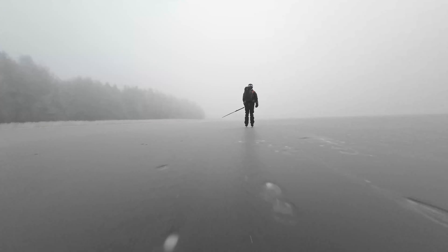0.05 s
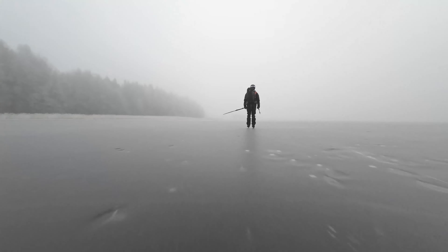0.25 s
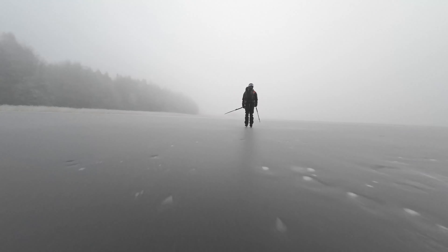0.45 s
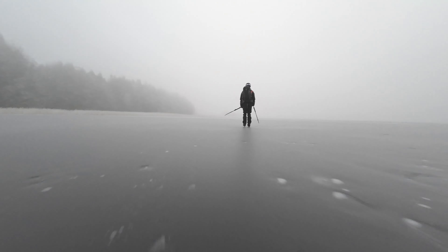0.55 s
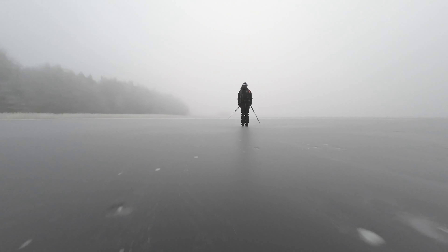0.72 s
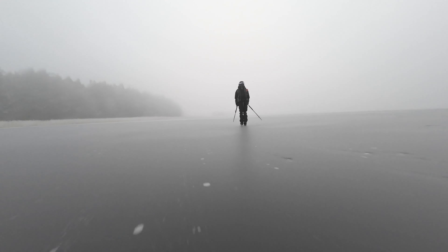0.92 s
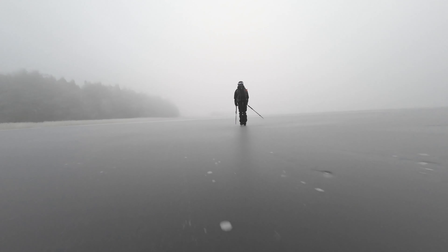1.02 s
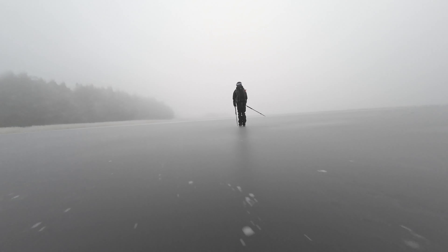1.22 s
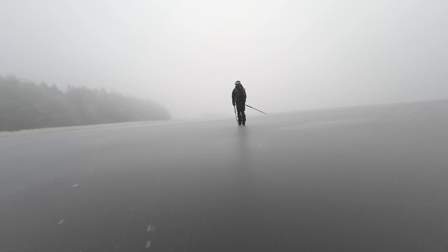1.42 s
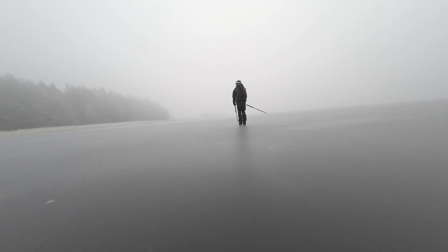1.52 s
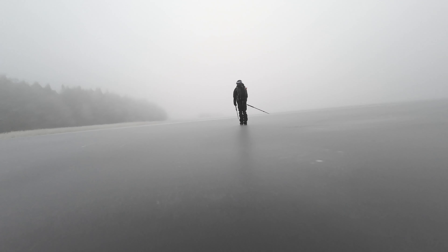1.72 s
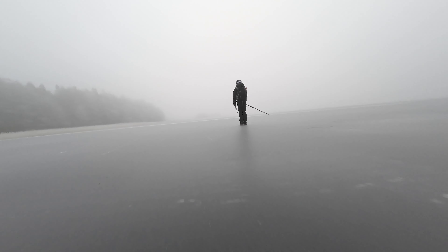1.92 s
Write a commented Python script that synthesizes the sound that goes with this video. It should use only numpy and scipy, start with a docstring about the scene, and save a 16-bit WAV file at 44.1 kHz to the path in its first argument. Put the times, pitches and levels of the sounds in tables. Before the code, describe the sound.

Skate blades hiss on outdoor ice, heard from the skater's position with light wind on the microphone. A pole bites with one loud crack and a short scrape, followed by irregular clacks and dull thumps over bumps.

```python
"""Out on lake ice, close up: touring skates heard from the microphone of the skater's own camera.
The blades rasp and hiss on the grain of the ice and knock over its ridges and bumps.
A steel pole tip clicks and rings; the loaded pole bites with a loud crack and scrapes along behind.
Pole and skates sit in the centre, the hiss lies wide, and light wind rumbles on the microphone."""
import sys
import numpy as np
from scipy import signal
from scipy.fft import rfft, irfft
from scipy.io import wavfile

SR = 44100
rng = np.random.default_rng(int(sys.argv[2]) if len(sys.argv) > 2 else 0)


def wav_record(signal):
    """Record a signal, one row per channel, as 16-bit PCM in the file named by sys.argv[1]."""
    frames = np.transpose(np.atleast_2d(signal))
    bounded = np.clip(frames, -1, 1)
    # unit amplitude maps onto the largest positive 16-bit level
    quanta = np.round(bounded * 32767).astype(np.int16)
    wavfile.write(sys.argv[1], SR, quanta)


N = 85995

# rasp of the blades underfoot (t/s, level/dB) and its spectrum (f/Hz, level/dB)
RASP_FADER = [(0, -60.5), (0.21, -59.5), (0.32, -52), (0.5, -50.5), (0.62, -51.5), (0.69, -52.5),
              (0.8, -50), (0.92, -49.5), (1.045, -50.5), (1.09, -44.5), (1.16, -50.5), (1.22, -49.5),
              (1.27, -53), (1.42, -51.5), (1.55, -48.5), (1.67, -50), (1.83, -49), (1.95, -50.5)]
RASP_SPECTRUM = [(60, 4), (150, 4.5), (300, 1.5), (500, -8), (800, -4.5), (1400, 0.5), (2000, 0),
                 (2800, -3), (3600, -6.5), (4500, -8.5), (5800, -5.5), (7500, -15.5), (11000, -17.5),
                 (16000, -46)]
# ring of the gliding skate (f/Hz, level/dB, t60/s)
SKATE_RING = [(466, 8.5, 0.031), (886, -4.5, 0.023), (1197, -0.5, 0.02), (1594, 0.5, 0.013),
              (1972, 0, 0.048), (2604, 0, 0.066), (2774, -1.5, 0.047), (6030, -2.5, 0.0048),
              (10800, -6, 0.006)]
# spectrum of the flutter in the glide's level (f/Hz, level/dB)
FLUTTER_SPECTRUM = [(4, -30), (14, 0), (40, -1), (120, -30), (500, -80)]
# the loaded edge sings faintly during the stroke (t/s, level/dB)
SING_FADER = [(0.6, -79), (0.9, -64.5), (0.98, -55), (1.05, -58), (1.1, -54), (1.19, -56.5), (1.26, -72)]
# fine hiss of the edges (t/s, level/dB) and its spectrum on each side (f/Hz, level/dB)
HISS_FADER = [(0, -67.5), (0.21, -68), (0.34, -49.5), (0.46, -53), (0.52, -58), (0.7, -61), (0.95, -56.5),
              (1.09, -56), (1.3, -58.5), (1.6, -55), (1.95, -58)]
HISS_LEFT_SPECTRUM = [(1000, -76), (3000, -60), (4300, 11), (5800, 22.5), (7500, 25), (11400, 5),
                      (12200, -15), (16000, -13)]
HISS_RIGHT_SPECTRUM = [(1000, -37), (3000, -67), (4500, -2.5), (6000, 9), (8000, 4.5), (11200, 8.5),
                       (12500, -3.5), (16000, -9.5)]
# wind on the microphone (t/s, level/dB) and its spectrum (f/Hz, level/dB)
WIND_FADER = [(0, -50), (0.5, -48.5), (0.59, -47), (0.66, -50.5), (1.1, -55), (1.35, -43), (1.6, -47),
              (1.82, -43.5), (1.95, -47)]
WIND_SPECTRUM = [(8, -10.5), (25, 4), (45, -10), (80, -13.5), (140, -19), (300, -38), (1000, -44)]
# the steel tip touches the ice (t/s, level/dB)
TIP_TOUCHES = [(0.0211, -41), (0.234, -22), (1.459, -36)]
# ring of the tip (f/Hz, level/dB, t60/s) and spectrum of its click (f/Hz, level/dB)
TIP_RING = [(730, -17, .018), (1300, -7, .02), (2240, -7, 0.041), (2660, -6, 0.063), (2640, -24, 0.099),
            (3370, -13.5, 0.069), (4530, -11, 0.026), (5060, -12.5, 0.067), (5510, -8, 0.033),
            (7540, -31, .07), (7900, -41, 0.07), (9200, -27, 0.051), (10270, -20, 0.04),
            (11000, -25.5, 0.063), (13710, -24, .025)]
CLICK_SPECTRUM = [(200, -14), (700, -1.5), (2500, 4), (5500, 3), (7500, -10.5), (11000, -21), (16000, -19)]
# bumps thump through skate and ice (t/s, level/dB, f/Hz, t60/s)
BUMPS = [(0.021, -36.5, 114, 0.022), (0.3279, -22, 163, 0.025), (0.3646, -19.5, 127, 0.023),
         (0.3945, -27.5, 230, 0.021), (0.3972, -28, 712, 0.03), (0.437, -29.5, 302, 0.054),
         (0.4893, -30, 190, 0.024), (0.5398, -30, 277, 0.013), (0.5861, -29, 178, 0.022),
         (0.6488, -21, 306, 0.014), (0.869, -34, 280, 0.022), (0.9950, -28.5, 358, 0.01),
         (1.0625, -30.5, 370, .014), (1.1960, -34, 300, 0.013), (1.4555, -18, 433, 0.012),
         (1.481, -34, 86, 0.098), (1.481, -20.5, 290, 0.014), (1.5097, -24, 294, 0.0098),
         (1.5435, -25.5, 305.6, 0.0095), (1.57, -33.5, 310, 0.017), (1.5772, -28, 297, 0.012),
         (1.6913, -20.5, 323, 0.017), (1.756, -19.5, 357, 0.012), (1.7868, -35, 412, 0.021),
         (1.801, -34.5, 76.3, 0.12), (1.839, -32, 240, 0.016), (1.930, -33.5, 300, 0.014)]
# the pole catches, takes the skater's weight and settles (t/s, level/dB)
POLE_LOADS = [(0.2548, -19), (0.2561, -8), (0.2790, -39)]
# ring of the loaded pole (f/Hz, level/dB, t60/s)
POLE_RING = [(193, -9, .012), (380, -4, .012), (500, -2.5, 0.013), (802, -15, 0.027), (1168, -4.5, 0.029),
             (1558, -3, 0.02), (2118, 0, 0.02), (2307, -1, 0.02), (2674, -5, 0.04), (2860, -17.5, 0.053),
             (3150, -11.5, 0.024), (3570, -13.5, 0.019), (3950, -18.5, 0.015), (4600, -17.5, 0.015),
             (6400, -22, .012), (10200, -40, .012)]
# ice crunching under steel, and the chips it sheds (f/Hz, level/dB)
CRUNCH_SPECTRUM = [(100, -12), (300, -4), (550, -2), (950, -3), (1500, -2.5), (2300, -2.5), (3000, -19),
                   (4500, -32.5), (8000, -31), (16000, -48)]
CHIP_SPECTRUM = [(1000, -22), (3300, 10), (5700, -0.5), (7500, -8), (11000, -9), (16000, -33)]
# scrape of the planted tip (t/s, level/dB) and its spectrum (f/Hz, level/dB)
SCRAPE_FADER = [(0.305, -68.5), (0.335, -41), (0.358, -39), (0.38, -41), (0.415, -40), (0.44, -40),
                (0.458, -43), (0.48, -49), (0.56, -52), (0.66, -58.5)]
SCRAPE_SPECTRUM = [(80, 3.5), (400, -2), (750, -6.5), (1300, 1), (1900, -0.5), (2700, -7), (4200, -14.5),
                   (5600, -16.5), (7500, -45), (11300, -33), (16000, -22)]
# steel resonances that the scrape keeps ringing (f/Hz, level/dB, t60/s)
SCRAPE_RING = [(750, 5.5, 0.013), (1336, 1, 0.028), (2660, -3.5, 0.15), (3410, 0, 0.035),
               (4910, -1.5, 0.023), (5730, -1, .024), (8400, -35, 0.019), (9000, -48, 0.025),
               (10800, -28, 0.03), (11400, -4.5, 0.029), (13300, -19, .012)]
# a blade hits a ridge (t/s, level/dB, grinding time/s, ring f/Hz, relative ring/dB, relative chips/dB)
RIDGES = [(0.327, -38.5, 0.0041, 2290, -24, -8), (0.3954, -30, 0.0012, 1270, 9.5, -6.5),
          (0.6478, -36.5, 0.0024, 1620, 3, -29), (0.683, -53, .001, 2780, -6, -0.5),
          (0.867, -50, 0.0069, 1400, -10, -27), (0.9947, -38.5, 0.00087, 1130, 10.5, -17),
          (1.0270, -47, 0.0033, 2760, 7, -14), (1.062, -32.5, 0.00071, 1440, 8, -14),
          (1.1959, -33, 0.0029, 1220, 6, -16), (1.2006, -35.5, 0.0015, 1930, 7, -15),
          (1.4540, -35.5, .002, 1520, -20, -24), (1.4562, -25, 0.0014, 1647, 12, -15.5),
          (1.4778, -36, 0.0055, 1920, 7, -17), (1.5090, -38, 0.0012, 1730, -8, -25),
          (1.6910, -31, 0.0022, 1360, -2, -24), (1.6941, -32.5, 0.0015, 2400, -18, -15.5),
          (1.729, -50, 0.0023, 2210, 15, -3), (1.7860, -42.5, 0.0012, 1690, 10, -12),
          (1.8010, -50, 0.0013, 2240, 12, -21)]
# share of the sound scattered differently to each side (f/Hz, level/dB)
SCATTER_SPECTRUM = [(100, -29), (700, -27.5), (1300, -58), (2400, -23), (4400, -8), (8000, -3), (15000, 3)]


def undb(db):
    """Decibels to gain."""
    return 10 ** (np.asarray(db) / 20)


def unit(x):
    """Scale to rms 1."""
    return x / np.sqrt(np.mean(x ** 2))


def since(start):
    """Seconds since a moment, zero before it."""
    return np.maximum(np.arange(N) / SR - start, 0)


def fader(points):
    """Gain that follows (t/s, level/dB) points."""
    return undb(np.interp(np.arange(N) / SR, *np.array(points).T))


def equalise(x, spectrum):
    """Filter along (f/Hz, level/dB) points."""
    hz, db = np.array(spectrum).T
    f = np.maximum(np.fft.rfftfreq(N, 1 / SR), 1)
    return irfft(rfft(x) * undb(np.interp(np.log(f), np.log(hz), db)), N)


def noise(spectrum):
    """Coloured noise at rms 1."""
    return unit(equalise(rng.standard_normal(N), spectrum))


def grains(per_s, spread_db):
    """Tiny fractures of the ice: random clicks, a few much larger than the rest."""
    size = undb(spread_db * np.minimum(rng.exponential(size=N), 6))
    return unit((rng.random(N) < per_s / SR) * size * rng.choice([-1, 1], N))


def burst(start, fall_s, hold_s=0):
    """Envelope with a sudden attack, a hold and an exponential fall."""
    t = since(start)
    return np.minimum(t / 0.00036, 1) * np.exp(-np.maximum(t - hold_s, 0) / fall_s)


def ring(start, modes, rise_s):
    """Damped modes (f/Hz, level/dB, t60/s) of alternating sign, set going by a push over rise_s."""
    t = since(start)
    waves = np.zeros(N)
    for k, (hz, db, t60) in enumerate(modes):
        decay = np.exp(-np.log(1000) * t / t60)
        waves -= (-1) ** k * undb(db) * np.sin(2 * np.pi * hz * t) * decay
    return waves * (1 - np.exp(-t / rise_s))


def resonate(x, modes):
    """Modes kept ringing by a steady signal, at rms 1."""
    return unit(signal.fftconvolve(x, ring(0, modes, rise_s=1 / SR))[:N])


def glide():
    """Underfoot the blades rasp unevenly on the ice, ring and sing; their hiss differs left and right."""
    flutter = undb(1.38 * noise(FLUTTER_SPECTRUM))
    grit = grains(per_s=9000, spread_db=1.9)
    rasp = unit(equalise(grit, RASP_SPECTRUM)) + undb(-10.5) * resonate(grit, SKATE_RING)
    sing = fader(SING_FADER) * resonate(rng.standard_normal(N), [(2756, 0, 0.015)])
    hiss = np.array([undb(-9.5) * noise(HISS_LEFT_SPECTRUM), undb(-0.5) * noise(HISS_RIGHT_SPECTRUM)])
    centre = flutter * (fader(RASP_FADER) * rasp + sing)
    return centre + np.sqrt(flutter) * fader(HISS_FADER) * hiss


def wind():
    """Low buffeting right on the microphone, unrelated on the two sides and stronger on the left."""
    return fader(WIND_FADER) * np.array([noise(WIND_SPECTRUM), undb(-3) * noise(WIND_SPECTRUM)])


def tip_taps():
    """A pole's length away, the steel tip clicks and rings each time it touches the ice."""
    out = np.zeros(N)
    for start, db in TIP_TOUCHES:
        click = undb(-4.5) * noise(CLICK_SPECTRUM) * burst(start, fall_s=0.0044)
        out += undb(db) * (ring(start, TIP_RING, rise_s=0.00038) + click)
    return out


def bump_thumps():
    """Each bump sends a dull thump through skate and ice: a low mode and one overtone."""
    out = np.zeros(N)
    for start, db, hz, t60 in BUMPS:
        overtone = (hz * 1.673, db - 8.5, 0.014)
        out += ring(start, [(hz, db, t60), overtone], rise_s=0.00097)
    return out


def pole_bite():
    """Close and loud, the loaded pole rings and cracks into the ice, which shudders and sheds chips."""
    out = np.zeros(N)
    push_s = 0.0022
    for start, db in POLE_LOADS:
        crack = undb(-23) * burst(start, fall_s=0.0018, hold_s=push_s)
        shudder = undb(-21) * burst(start, fall_s=0.018)
        chips = undb(-37.5) * burst(start, fall_s=0.026) * noise(CHIP_SPECTRUM)
        crunch = (crack + shudder) * noise(CRUNCH_SPECTRUM)
        out += undb(db) * (ring(start, POLE_RING, rise_s=push_s) + crunch + chips)
    return out


def tip_scrape():
    """Dragged behind, the steel tip crumbles the ice, rings faintly and chatters just before it lifts."""
    crumbs = grains(per_s=5800, spread_db=1.5)
    scrape = unit(equalise(crumbs, SCRAPE_SPECTRUM)) + undb(-7.5) * resonate(crumbs, SCRAPE_RING)
    chatter_hz, band_hz, peak_s, width_s = 2190, 160, 0.4397, 0.015
    shaft = unit(signal.lfilter(*signal.iirpeak(chatter_hz, chatter_hz / band_hz, fs=SR), crumbs))
    swell = np.exp(-((since(0) - peak_s) / width_s) ** 2)
    return fader(SCRAPE_FADER) * scrape + undb(-35.5) * swell * shaft


def ridge_clacks():
    """At each ridge the blade grinds for an instant, rings and throws chips."""
    out = np.zeros(N)
    crunch, spray = noise(CRUNCH_SPECTRUM), noise(CHIP_SPECTRUM)
    for start, db, grind_s, ring_hz, ring_db, chips_db in RIDGES:
        grind = crunch * burst(start, fall_s=0.0032, hold_s=grind_s)
        blade = ring(start, [(ring_hz, ring_db, 0.017)], rise_s=0.00085)
        chips = undb(chips_db) * spray * burst(start, fall_s=0.0076, hold_s=grind_s)
        out += undb(db) * (grind + blade + chips)
    return out


def scatter(x, fall_s):
    """Very short reflections make the treble differ between the microphone's left and right."""
    echoes = rng.standard_normal(N) * np.exp(-since(0) / fall_s)
    reflected = signal.fftconvolve(x, echoes / np.linalg.norm(echoes))[:N]
    side = equalise(reflected, SCATTER_SPECTRUM)
    return np.array([x + side, x - side])


def scene():
    """From the skater's position: pole and skates in the centre, hiss and wind around them."""
    bed = glide() + wind()
    contacts = tip_taps() + bump_thumps() + pole_bite() + tip_scrape() + ridge_clacks()
    return bed + scatter(contacts, fall_s=0.00096)


def record(dry):
    """The camera cuts the top treble steeply."""
    top_hz = 15800
    return signal.sosfilt(signal.ellip(10, .2, 70, top_hz, fs=SR, output="sos"), dry)


dry = scene()
out = record(dry)
wav_record(out)
```